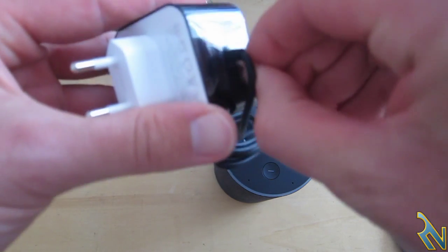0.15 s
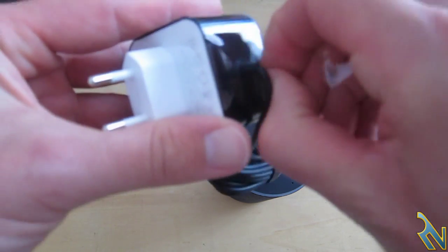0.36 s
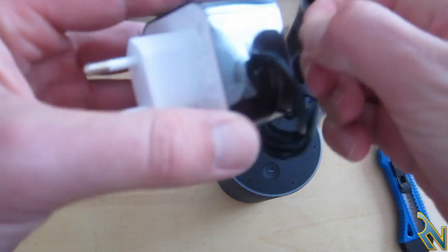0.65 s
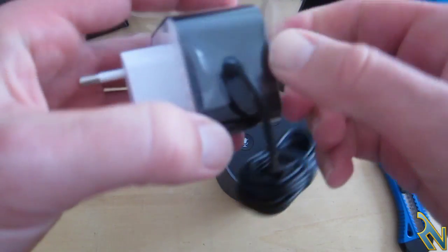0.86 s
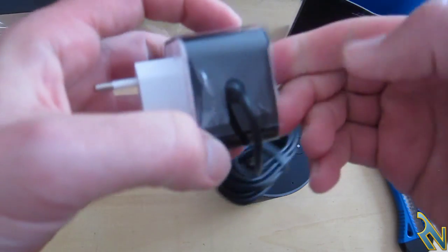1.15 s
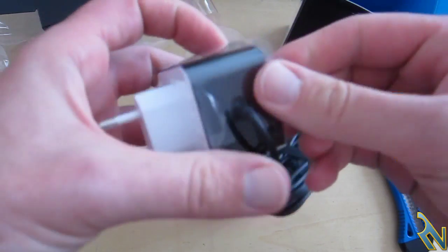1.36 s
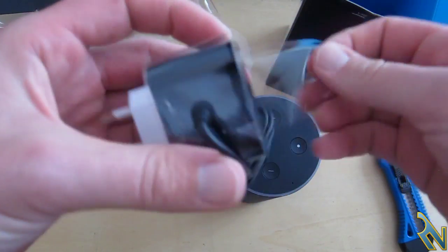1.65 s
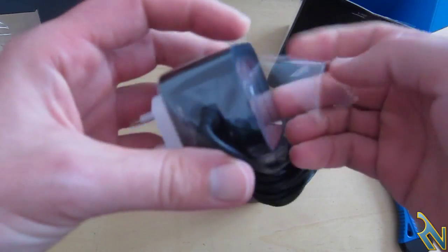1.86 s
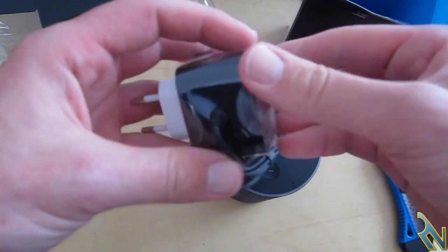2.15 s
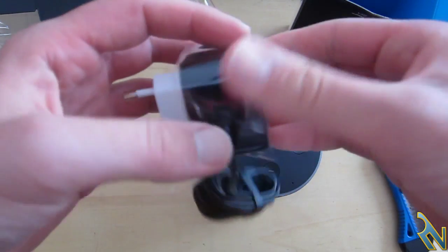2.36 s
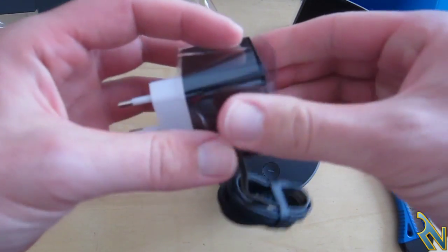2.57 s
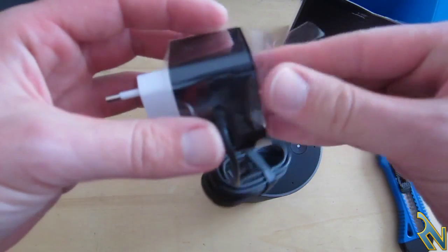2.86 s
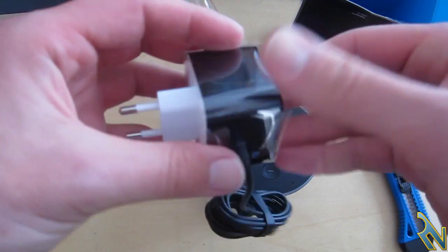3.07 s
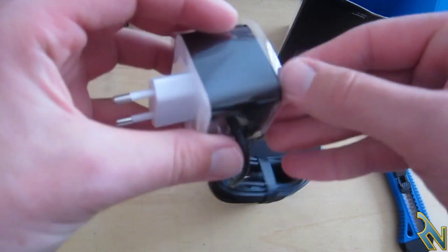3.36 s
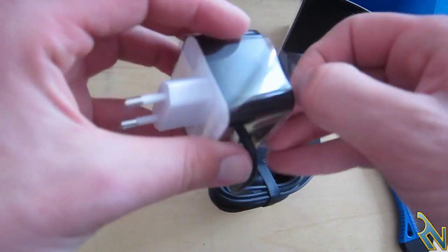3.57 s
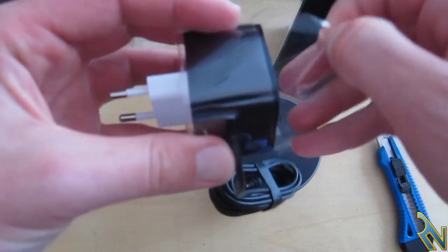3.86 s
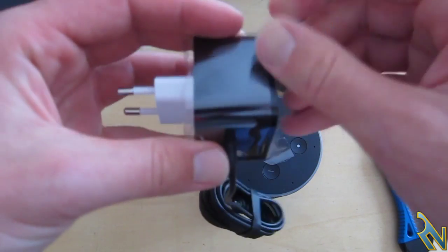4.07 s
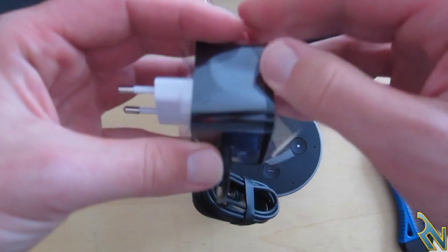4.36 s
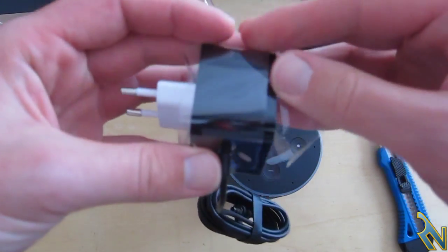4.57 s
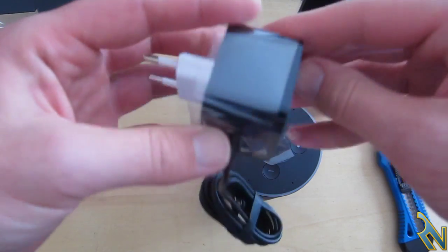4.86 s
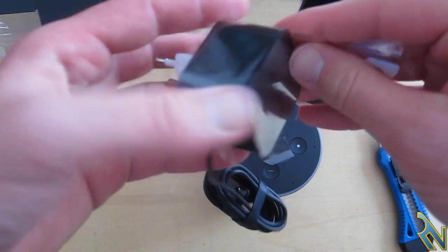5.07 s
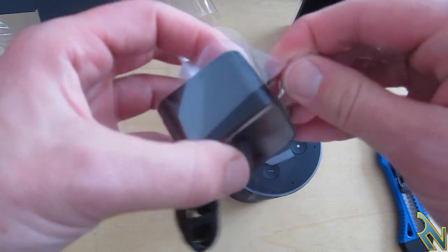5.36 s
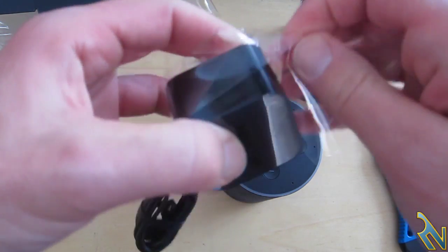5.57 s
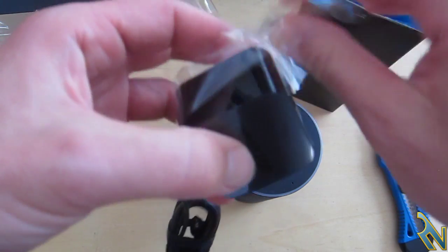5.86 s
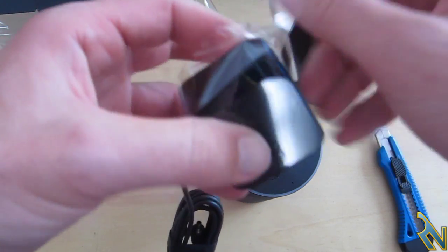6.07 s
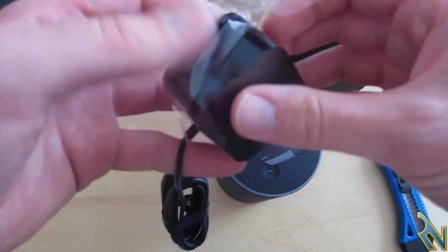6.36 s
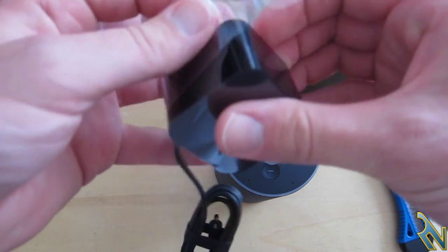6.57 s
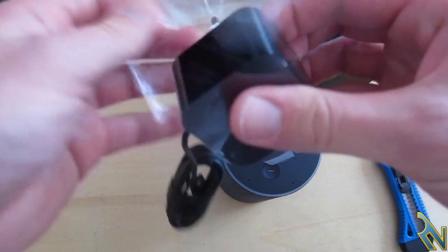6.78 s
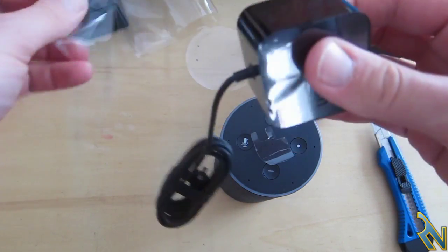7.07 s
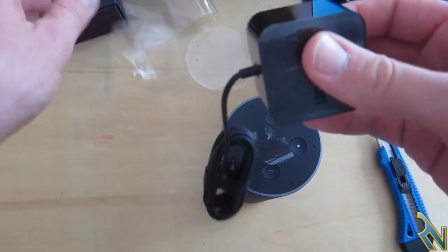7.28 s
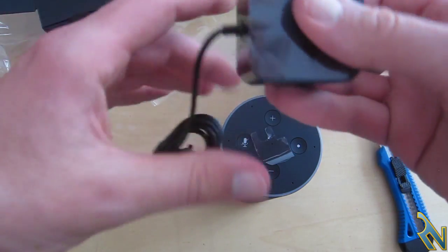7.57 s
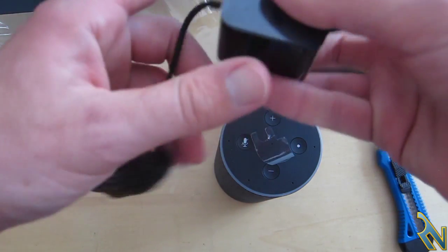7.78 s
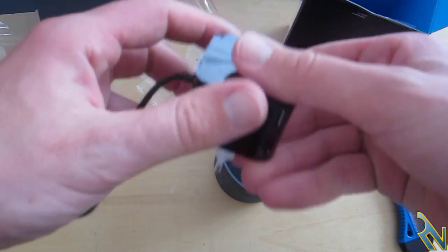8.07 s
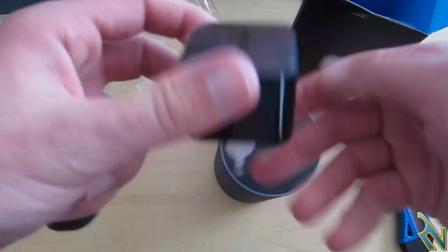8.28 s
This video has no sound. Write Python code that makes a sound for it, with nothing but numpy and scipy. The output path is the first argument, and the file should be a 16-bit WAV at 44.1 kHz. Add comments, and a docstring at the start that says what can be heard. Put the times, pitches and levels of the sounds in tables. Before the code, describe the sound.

Close, bright plastic film noise: brittle ticks, crackling rustle, short tearing rasps and one fast buzzing rip midway, with a tiny squeak earlier. Dull finger taps come from the hollow plastic box beneath. The peeling eases after seven seconds, a light object lands with a double click on the tabletop, and faint handling remains. Small quiet indoor room, short soft reflections, low drifting air hiss.

```python
"""At a table in a small room, hands peel a thin clinging film off a small glossy box, close to two microphones.
Creases snap and glue rips: short noise bursts ring the film, the box and the fine wrinkles.
Flickering noise makes the rustle, struck resonances the knocks, and unsteady tones the two squeaks.
Near the end something light drops on the table. The room answers softly over a drifting hiss."""
import sys
import numpy as np
from scipy import signal
from scipy.fft import rfft, irfft
from scipy.io import wavfile
from scipy.ndimage import uniform_filter1d

SR = 44100
rng = np.random.default_rng(int(sys.argv[2]) if len(sys.argv) > 2 else 0)


def int16_out(signal):
    """Quantize to a 16-bit WAV file."""
    q = np.round(np.clip(np.atleast_2d(signal).T, -1, 1) * 32767)
    wavfile.write(sys.argv[1], SR, q.astype(np.int16))


N = 371763
T = np.arange(N) / SR


def undb(db):
    """Turns decibels into a plain multiplier."""
    return 10 ** (np.asarray(db) / 20)


def unit(x):
    """Scales to an average (rms) level of 1 along the last axis."""
    return x / np.sqrt(np.mean(x ** 2, axis=-1, keepdims=True) + 1e-18)


def peak(x):
    """Scales each stereo event so the middle of left and right swings to 1."""
    return x / np.abs(x.mean(axis=1)).max(axis=-1)[:, None, None]


def ring(x, hz, width_hz, order=1):
    """Resonance: favours sound near one pitch; a narrow width rings longer."""
    f = np.fft.rfftfreq(x.shape[-1], 1 / SR) + 1  # +1 avoids dividing by zero
    response = 1 / (1 + 1j * (f - hz ** 2 / f) / width_hz) ** order
    return irfft(rfft(x) * response, x.shape[-1])


def place(rows, times):
    """Adds stereo events (events, 2, length) to a track at their times in seconds."""
    out = np.zeros((2, N + rows.shape[-1]))
    for row, i in zip(rows, (np.asarray(times) * SR).astype(int)):
        out[:, i:i + row.shape[-1]] += row
    return out[:, :N]


def pair(x, apart):
    """Makes left and right from a shared noise and one that differs, more so for short waves."""
    side = x[..., 1:, :]
    treble = side - np.roll(side, 1, axis=-1)
    return x[..., :1, :] + apart * (0.65 * side + treble) * np.array([[1], [-1]])


ECHO_MS, ECHO_DB = 2.2, -17.5  # bounce off the table top
RISE_MS = 0.18  # time constant of the build-up


def bursts(count, length_ms, size, grain_db=3.5):
    """Sudden releases: spiky noise builds up for 2 ms, dies away and bounces off the table."""
    ms = np.arange(size) / SR * 1000
    spikes = undb(grain_db * rng.exponential(size=(count, 1, size)))
    x = rng.standard_normal((count, 2, size)) * spikes
    x = x * np.exp(-np.where(ms < 2, (2 - ms) / RISE_MS, (ms - 2) / length_ms))
    return x + undb(ECHO_DB) * np.roll(x, int(ECHO_MS * SR / 1000), axis=-1)


# Notes of the box: pitch_hz, width_hz, level_db (before a further broad resonance)
BOX_NOTES = [(90, 190, -12), (307, 250, -4.5), (756, 85, -4), (1073, 590, 0.5), (1800, 510, -3.5)]


def regions(x, hz):
    """What a release shakes: the stretched film (ringing around hz), the box, the fine wrinkles."""
    x = pair(x, 0.43)
    film = ring(x, hz, 1.104 * hz, order=2)
    film = film + 0.44 * ring(x, 6160.0, 1200.0) + 0.32 * ring(x, 2400.0, 1700.0)
    box = sum(undb(db) * ring(x, f, w) for f, w, db in BOX_NOTES)
    thud = ring(box, 600.0, 3000.0)
    sizzle = ring(x, 9995, 6000.0, order=2)
    return film, thud, sizzle


def flicker(rate, depth_db, sag_s, steady):
    """Level that jumps at random (rate per second) and sags quickly, as patches of film catch."""
    sizes = undb(depth_db * np.minimum(rng.exponential(size=N), 3.0))
    hits = (rng.random(N) < rate / SR) * sizes
    return unit(steady + signal.lfilter([1], [1, -np.exp(-1 / (sag_s * SR))], hits))


def rubbing(film, thud, sizzle, catch):
    """Dense tiny creases at the given gains; the same catches drive film, box and wrinkles."""
    parts = regions(rng.standard_normal((2, N)) * catch, 3565.0)
    return sum(gain * unit(part) for gain, part in zip((film, thud, sizzle), parts))


FILM_HZ, SNAP_MS = 4190, 0.73  # middle film pitch; time constant of a snap's decay
SPOT_LAG_MS = 0.0065  # left-right arrival lag for a spot one typical spread off centre
# Creases and glue spots letting go:
# time_s, film_db (peak), thud_db and sizzle_db (peaks relative to the film)
CREASE_SNAPS = [(0.0843, -44, -8, 11), (0.099, -41, -7, 10), (0.1058, -34, -11, 7.5), (0.211, -10, -13, 0),
                (0.2363, -15, -11, 8), (0.2474, -34, -22, 25.5), (0.252, -17, -32.5, 7),
                (0.2686, -19, -26.5, 1), (0.2807, -19.5, -13, 15), (0.2998, -32.5, -34, 17),
                (0.3203, -22.5, -27, 13), (0.339, -31, -23, 3), (0.356, -11.5, -16, 7.5),
                (0.3727, -11.5, -29, 6.5), (0.3915, -12, -27, 6.5), (0.4056, -39, -22, 4),
                (0.4188, -29, -7.5, 7), (0.4354, -24, -31, 10.5), (0.473, -5.5, -16, 5.5),
                (0.5017, -11, -12.5, 8.5), (0.506, -27, -25, 20), (0.5159, -34, -26, -5),
                (0.5336, -9.5, -16.5, 7.5), (0.5397, -23, -24, 8), (0.5533, -20, -28, 8),
                (0.563, -14, -29, -15), (0.5672, -18.5, -6.5, 13), (0.5744, -14.5, -13, 8),
                (0.582, -17, -18, 6), (0.5905, -15.5, -11, 11), (0.5918, -13, -24, 0),
                (0.5973, -13, -16, 3), (0.687, -26, -9, -19), (0.698, -18.5, -6, -11),
                (0.7411, -26, -16, -30), (0.8266, -35, -31, -9), (0.8851, -30.5, -24, 2.5),
                (0.9994, -12.5, -20.5, -11), (1.0427, -21, -14, -4), (1.0543, -17, -7.5, -15),
                (1.1421, -7.5, -19, -10), (1.1514, -27, -7, -6), (1.3158, -15.5, -17.5, 0),
                (1.483, -19.5, -13, -20), (1.494, -15.5, -17, -30), (1.509, -7.5, -18, 0),
                (1.5926, -23, 0, -28), (1.5966, -9, -2, -32.5), (1.6317, -1.5, -6, -4),
                (1.636, -3, -43, -25), (1.6765, -12, -22, -10), (1.6815, -8, -20, -6),
                (1.6987, -12.5, -10, -1), (1.7746, -19, -7, -9), (1.917, -17.5, -7.5, -10),
                (1.9531, -4, -5.5, -12), (1.9604, -3.5, -13.5, -36), (1.9677, -13, -23, -21),
                (1.9941, -6, -24, -14), (2.0005, -18, -26, -14), (2.0137, -7, -31, -34),
                (2.0369, -9.5, -21, -10), (2.0492, -11, -20, -17), (2.0577, -7.5, -8, -26),
                (2.0699, -21, -21, -16), (2.1298, -15, -21, -2), (2.2914, -12, -7.5, -5.5),
                (2.4953, -22.5, -12.5, -6.5), (2.6152, -16.5, -20, -18), (2.8829, -24, -12, -7),
                (2.9092, -8, -16.5, 2.5), (2.9201, -8, -26, -7.5), (2.9332, -21, -14, -3),
                (3.158, -6, -37, -2.5), (3.1805, -14.5, -28.5, 0.5), (3.1894, -19.5, -30, 5),
                (3.2013, -14.5, -35, -1), (3.2492, -11, -32, -19), (3.2762, 1.5, -24, 1),
                (3.553, -13.5, -32, -5), (3.5628, -15, -12.5, -12), (3.5856, -28, -16, 0.5),
                (3.6753, 5, -34, -2), (3.702, -12, -12, -11), (3.7363, -26, 2.5, -15),
                (3.7868, -5.5, -20, -12), (3.801, -11, -11, -2.5), (3.8056, -24.5, 1.5, -18),
                (3.884, -26.5, -28, 4), (3.9544, -13.5, -24, 0), (3.9804, -15.5, -8.5, -30),
                (4.0137, -17.5, -25, -10), (4.0388, -26, -1, -20), (4.0962, -8.5, -18.5, -17),
                (4.112, -14, -18, -14), (4.117, -5, -30, -9), (4.1346, -18, -28, -4),
                (4.2049, -19.5, -14, -2), (4.2116, -15.5, -24, -2), (4.2357, -13.5, -18.5, 0),
                (4.2408, -11.5, -25.5, -0.5), (4.2478, -9, -12.5, 0.5), (4.3022, -21, -8.5, 5),
                (4.4429, -20.5, -28.5, 1.5), (4.5047, -17.5, -22.5, -15), (4.5309, -12, -31.5, -17.5),
                (4.5366, -16, -31.5, -8.5), (4.629, -26, -7, -11), (4.6616, -14.5, -20.5, -2),
                (4.8176, -31, -30, -17), (5.0715, -43, -19, -12), (5.1264, -21.5, -9, -6),
                (5.2703, -13.5, -26, -10), (5.3313, -1, -14.5, -3), (5.467, -25, -26, -7),
                (5.4722, -9.5, -38, -9), (5.512, -13, -23, 2.5), (5.5636, -30, -3, -14),
                (5.5994, -13, -6.5, -22), (5.6205, -18, -14, -32), (5.65, -7, -15.5, -3),
                (5.6932, -12, -9, -17), (5.7304, -28, -18, -17), (5.7394, -19, -35, -30),
                (5.759, -18, -15, -11), (5.7716, -1, -17, -13), (5.8911, -8.5, -15, -4.5),
                (5.8989, -8.5, -6.5, -16), (5.9089, -17, -19, -21), (5.9267, -18.5, -6.5, -33),
                (6.077, -27.5, -25, 2), (6.1411, -23, -9, 0), (6.1915, -1, -22, -11.5),
                (6.2047, -7.5, -26, -9.5), (6.5029, -6.5, -42, -4.5), (6.5073, -2, -19, -3),
                (6.5748, -27, -21, -1.5), (6.687, -14.5, -5, -25), (6.7626, -5, -24, -3.5),
                (6.7788, -17, -12, 2), (6.7884, -1.5, -32.5, -13), (6.8152, -18.5, -6, -13),
                (6.8229, -7.5, -12, -2.5), (6.9127, -9.5, -23.5, -6), (6.9265, -23, -10.5, -15),
                (6.9452, -16.5, -33, -3), (7.1172, -35, 1.5, 0), (7.1822, -17.5, -12.5, -8),
                (7.2192, -33.5, -4.5, -21)]


def snaps():
    """Single releases; tight creases, rich in sizzle, ring higher; each has its own spot."""
    s, film_db, thud_db, sizzle_db = (c[:, None, None] for c in np.transpose(CREASE_SNAPS))
    scatter_db, spot = rng.standard_normal((len(s), 2)).T[..., None, None]
    tightness = np.clip(sizzle_db + 8.5, -6, 20)
    # pitch also shifts by a decibel-style ratio
    hz = FILM_HZ * undb(0.13 * tightness + 1.3 * scatter_db)
    noise = bursts(len(s), SNAP_MS, size=1024, grain_db=1.5)
    film, thud, sizzle = map(peak, regions(noise, hz))
    rows = undb(film_db) * (film + undb(thud_db) * thud + undb(sizzle_db) * sizzle)
    # a spot further to one side is louder and earlier at that microphone
    side = spot * np.array([[0.5], [-0.5]])
    f = np.fft.rfftfreq(rows.shape[-1], 1 / SR)
    lead = np.exp(2j * np.pi * f * side * SPOT_LAG_MS / 1000)
    return place(irfft(rfft(rows) * lead) * undb(0.63 * side), s.ravel() - 2 / 1000)


ZIP_S, ZIP_SLIPS = 4.6412, 13  # start and number of slips
ZIP_GAP_MS, ZIP_SLOWING, ZIP_JITTER_MS = 1.0, 0.025, 0.08  # slowing is a share per slip
ZIP_DB, ZIP_FADE_DB, ZIP_SIZZLE_DB = -0.5, -1.02, -16  # first slip; change per slip; relative to film
ZIP_HZ, ZIP_WIDTH_HZ = 3500, 2000


def zip_off():
    """The hardest pull: glue lets go in a quick buzz of slips that slows and weakens."""
    k = np.arange(ZIP_SLIPS)
    jitter, scatter_db = rng.standard_normal((len(k), 2)).T
    delay_ms = ZIP_GAP_MS * k * (1 + ZIP_SLOWING * k) + ZIP_JITTER_MS * jitter
    s = ZIP_S + delay_ms / 1000
    film, _, sizzle = regions(bursts(len(k), 0.25, size=1024, grain_db=1.0), ZIP_HZ)
    film, sizzle = peak(ring(film, ZIP_HZ, ZIP_WIDTH_HZ)), peak(sizzle)
    gain = undb(ZIP_DB + ZIP_FADE_DB * k + 1.5 * scatter_db)[:, None, None]
    return place(gain * (film + undb(ZIP_SIZZLE_DB) * sizzle), s - 2 / 1000)


# before a snap the glue strains; after it the freed film crackles on, then settles
# levels are relative to the snap; times are time constants
BEFORE_DB, BEFORE_MS = -32.5, 2.4
AFTER_DB, AFTER_MS = -34, 18.8
# the box under a tear: its level at a gentle tear, and the share of the film's dB by which it grows
RIP_THUD_DB, GENTLE_DB, RIP_THUD_SHARE = -50, -40.5, 0.66
# Short dense rasps, glue tearing or (the faint late ones) fingers sliding:
# crest_s, half_length_ms (about 7 dB down), film_db, sizzle_db (relative to the film)
TEARS = [(.24, 7.2, -51.5, 6.5), (0.324, 3, -28, -3.5), (0.588, 8.9, -32, -10), (.7, 10, -47, 0),
         (0.738, 8, -44.5, -14), (1.05, 15, -41.5, 2), (1.147, 12.7, -42, 2), (1.479, 29.5, -34.5, 1),
         (1.507, 4.8, -30.5, -9), (1.692, 21, -37.5, -3), (1.761, 19, -35.5, -4), (1.848, 22, -38.5, 1.5),
         (1.921, 6.6, -31.5, -9), (1.958, 10.3, -25, -15), (2.011, 22, -32, -8), (2.055, 13.4, -27.5, -15),
         (2.58, 21, -48, -2), (2.171, 4, -41, -20), (2.282, 12.8, -32.5, -5), (2.376, 15, -61.5, 19),
         (2.83, 59, -57, 9.5), (2.909, 10, -38.5, -11), (3.056, 12.6, -45.5, -4), (3.19, 46, -43.5, 1),
         (3.239, 24, -32.5, 1), (3.478, 13, -44, 3.5), (3.804, 5.9, -34, -7), (3.958, 5, -27.5, -8),
         (4.015, 23, -42, -12), (4.117, 9, -33, -5), (4.206, 15.8, -29, -16), (4.245, 10, -40, -2),
         (4.409, 19, -41, -9), (4.498, 11, -34.5, -18.5), (4.539, 12.3, -37, -22.5),
         (4.633, 5, -29.5, -6.5), (4.659, 15.5, -27.5, -6.5), (4.832, 8.3, -40.5, -19),
         (4.927, 17.3, -41, -7.5), (4.966, 2.2, -33, -10), (5.128, 8.4, -34.5, 3.5), (5.309, 6.3, -42, 0),
         (5.444, 16, -41.5, -14), (5.548, 9.2, -43.5, -3), (5.596, 4.3, -26, -18), (5.652, 3.5, -23, -21),
         (5.708, 5.9, -26.5, 0.5), (5.862, 7.8, -32, 3.5), (5.903, 18, -41, -6), (6.179, 17.4, -31, -4),
         (6.207, 5.2, -29.5, -35), (6.351, 9.7, -41.5, -4), (6.506, 17, -35, -8.5),
         (6.639, 1.8, -33.5, -10), (6.745, 45, -38.5, -15), (6.792, 11.8, -27, 0.5), (6.93, 56, -55, -5),
         (7.148, 18, -42.5, -1), (7.529, 9.3, -64, 8.5), (7.675, 16, -64, 3), (8.03, 53, -75, 5),
         (8.2, 12, -64.5, -1), (8.262, 6, -57, -5), (8.351, 50, -63, 0.5)]


def fade(x, ms):
    """Lets each spike die away smoothly."""
    return signal.lfilter([1], [1, -np.exp(-1000 / (ms * SR))], x)


def rips():
    """Each tear swells to a crest and falls; each snap has a short crackle before and after it."""
    gains = np.zeros((3, N))  # film, box, wrinkles
    for s, half_ms, db, sizzle_db in TEARS:
        near = slice(int((s - 0.12) * SR), int((s + 0.12) * SR))
        ms = (T[near] - s) * 1000
        thud_db = RIP_THUD_DB + RIP_THUD_SHARE * (db - GENTLE_DB)
        swell = np.exp(-0.8 * (ms / half_ms) ** 2)
        gains[:, near] += undb([[db], [thud_db], [db + sizzle_db]]) * swell
    s, db, thud_db, sizzle_db = np.transpose(CREASE_SNAPS)
    freed = np.zeros((3, N))
    freed[:, (s * SR).astype(int)] = undb(db + np.array([0 * db, thud_db, sizzle_db]))
    gains += undb(AFTER_DB) * fade(freed, AFTER_MS)
    gains += undb(BEFORE_DB) * fade(freed[:, ::-1], BEFORE_MS)[:, ::-1]  # run backwards in time
    return rubbing(*gains, flicker(rate=1100.0, depth_db=4.0, sag_s=0.0013, steady=0.88))


# the box is rubbed along: its level rises by this share of the film's dB above a resting level
BOX_RUB_DB, BOX_RUB_SHARE, REST_DB = -59, 0.95, -50.5
# Film and fingers rubbing between the snaps: time_s, film_db, sizzle_db
RUSTLE_LEVELS = [(0.0, -80.5, -64), (0.16, -58, -53.5), (0.42, -63, -69), (0.63, -51, -49),
                 (0.8, -63.5, -67), (1.41, -56, -57), (1.69, -45.5, -47.5), (1.85, -40, -46.5),
                 (2.51, -59.5, -59.5), (3.03, -55, -59.5), (3.5, -54, -55.5), (3.85, -47.5, -49),
                 (4.62, -48, -55), (4.93, -52, -65.5), (5.26, -60, -57), (5.49, -46, -51.5),
                 (5.73, -36.5, -48), (5.91, -52, -54), (6.43, -50, -63), (6.71, -40.5, -46.5),
                 (7.0, -49.5, -53.5), (7.23, -66, -68), (7.77, -86, -81), (8.43, -67.5, -76.5)]


def rustle():
    """The film never rests in the hands: flickering noise follows slowly changing levels."""
    s, *columns = np.transpose(RUSTLE_LEVELS)
    film_db, sizzle_db = (np.interp(T, s, c) for c in columns)
    thud_db = BOX_RUB_DB + BOX_RUB_SHARE * (film_db - REST_DB)
    catch = flicker(rate=110.0, depth_db=4.5, sag_s=0.0015, steady=0.5)
    return rubbing(undb(film_db), undb(thud_db), undb(sizzle_db), catch)


# Film slipping and sticking on the gloss: start_s, length_s,
# start_rate_hz, middle_rate_hz, end_rate_hz (slips), level_db (before the wavering)
FILM_SQUEAKS = [(3.204, .038, 2250, 1480, 1850, -33), (5.482, .03, 650, 830, 1050, -50)]


def squeaks():
    """Nearly regular slips sound as a tone with overtones; rate and grip waver."""
    out = np.zeros(N)
    for s, length_s, *hz, db in FILM_SQUEAKS:
        u = np.clip((T - s) / length_s, 0, 1)  # progress from 0 to 1
        waver = unit(uniform_filter1d(rng.standard_normal((2, N)), size=90))
        rate = np.polyval(np.polyfit([0, 0.5, 1], hz, 2), u)
        phase = 2 * np.pi * np.cumsum(rate * (1 + 0.03 * waver[0])) / SR
        tone = 0.35 * np.sin(phase) + np.sin(2 * phase) + 0.3 * np.sin(3 * phase)
        swell = np.sqrt(np.sin(np.pi * u).clip(0))
        out += swell * undb(db + 4 * waver[1]) * tone
    return out


KNOCK_WIDTH = 0.49  # share of the ring pitch
PING_HZ, PING_WIDTH_HZ = 860, 24
# Fingers tapping and shifting on the box: time_s, peak_db, pitch_hz
FINGER_KNOCKS = [(.733, -37, 600), (1.507, -35, 273), (1.629, -27, 440), (1.952, -30, 365),
                 (3.951, -29, 328), (4.018, -34, 255), (4.104, -41, 250), (5.563, -31, 734),
                 (5.591, -38, 308), (5.697, -37.5, 200), (6.158, -29.5, 970), (6.174, -30, 750),
                 (6.33, -40.5, 910), (6.406, -44, 247), (6.426, -42.5, 320), (6.785, -34, 275),
                 (8.189, -51.5, 280)]
# Two faint clear rings: time_s, peak_db
CLEAR_PINGS = [(3.327, -45.5), (3.356, -44)]


def knocks():
    """Soft blows that ring the box or the coiled cable: short noise through a resonance."""
    rows = [(s, db, hz, KNOCK_WIDTH * hz) for s, db, hz in FINGER_KNOCKS]
    rows += [(s, db, PING_HZ, PING_WIDTH_HZ) for s, db in CLEAR_PINGS]
    s, db, hz, width_hz = (c[:, None, None] for c in np.transpose(rows))
    blow = ring(pair(bursts(len(s), 4.5, size=8192), 0.2), hz, 2 * hz)
    return place(peak(ring(blow, hz, width_hz)) * undb(db), s.ravel() - 2 / 1000)


# A light thing landing, then its bounce: time_s, peak_db
LANDINGS = [(7.41, -20.5), (7.434, -20)]
# Notes of the struck table: pitch_hz, width_hz, level_db (relative to each other)
TABLE_NOTES = [(784, 420, 0.5), (1145, 560, 6.5), (2210, 370, -3), (4430, 4000, 9.5), (10950, 5500, 0)]


def drops():
    """A light thing lands on the table and bounces once; each blow rings the table's notes."""
    s, db = np.transpose(LANDINGS)
    decay_ms = np.array([6.0, 1.8])[:, None, None]
    blow = pair(bursts(len(s), decay_ms, size=4096, grain_db=0.0), 0.45)
    rows = sum(undb(g) * unit(ring(blow, f, w)) for f, w, g in TABLE_NOTES)
    return place(peak(rows) * undb(db)[:, None, None], s - 0.001)


LEFT_DB, LEFT_LAG_MS = -1, 0.0076  # the hands work a little right of centre


def aside(x):
    """Off-centre sound is weaker and later at the left microphone."""
    lag = np.exp(-2j * np.pi * np.fft.rfftfreq(N, 1 / SR) * LEFT_LAG_MS / 1000)
    left = irfft(rfft(x[0]) * lag, N) * undb(LEFT_DB / 2)
    return np.array([left, x[1] * undb(-LEFT_DB / 2)])


# time for each echo noise to fade by 60 dB, and its level
ROOM_T60_S, ROOM_DB = 0.38, -25
EARLY_T60_S, EARLY_DB = 0.03, -17


def room(x, wet_db):
    """Nearby objects scatter at once; the walls add a longer, duller tail of fading noise."""
    t = np.arange(SR // 2) / SR
    early = pair(rng.standard_normal((2, len(t))), 1.0) * undb(-60 * t / EARLY_T60_S)
    early = unit(early) * undb(EARLY_DB)
    walls = ring(pair(rng.standard_normal((2, len(t))), 0.56), 880.0, 3500.0)
    late = unit(walls * undb(-60 * t / ROOM_T60_S)) * undb(wet_db)
    echo = (early + late) / np.sqrt(len(t))
    return signal.fftconvolve(x.mean(axis=0, keepdims=True), echo, axes=1)[:, :N]


# Colour of the hiss: pitch_hz, level_db (relative to each other)
HISS_COLOUR = [(20, -26), (40, -11), (110, -4.5), (300, -8), (620, -13), (1500, -16.5), (4250, -23.5),
               (7000, -28.5), (11000, -26.5), (16000, -37.5)]
# The hiss, mostly low, drifts: time_s, level_db
HISS_DRIFT = [(0.0, -50), (0.94, -66.5), (1.64, -56), (8.43, -61.5)]


def hiss():
    """Air rumble and amplifier noise: coloured noise, unrelated left and right."""
    f = np.fft.rfftfreq(N, 1 / SR) + 1
    hz, db = np.transpose(HISS_COLOUR)
    colour = undb(np.interp(np.log(f), np.log(hz), db))
    noise = unit(irfft(rfft(rng.standard_normal((2, N))) * colour, N))
    return noise * undb(np.interp(T, *np.transpose(HISS_DRIFT)))


def scene():
    """Adds the sounds of the hands, the drop, their room echoes and the hiss."""
    film = snaps() + zip_off() + rips() + rustle() + squeaks() + knocks()
    drop = drops()
    return aside(film) + room(film, ROOM_DB) + drop + room(drop, -10.5) + hiss()


NOTCH_HZ, NOTCH_WIDTH_HZ, NOTCH_DB = 8196, 1640, -31.5  # dip of the microphone opening
TOP_HZ = 16100


def record(dry):
    """The microphone openings lose a narrow band and some treble; the top and overloads are cut."""
    x = dry - (1 - undb(NOTCH_DB)) * ring(dry, NOTCH_HZ, NOTCH_WIDTH_HZ)
    x = x - 0.65 * ring(x, 16500.0, 6000.0)
    top_cut = signal.ellip(8, 0.2, 75, TOP_HZ, fs=SR, output="sos")
    return np.clip(signal.sosfilt(top_cut, x), -1, 1)


dry = scene()
out = record(dry)
int16_out(out)
```